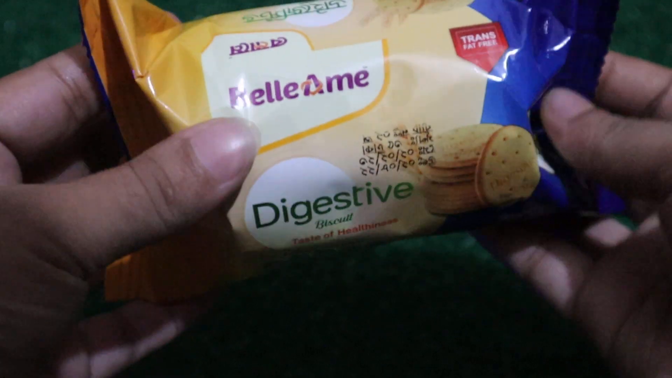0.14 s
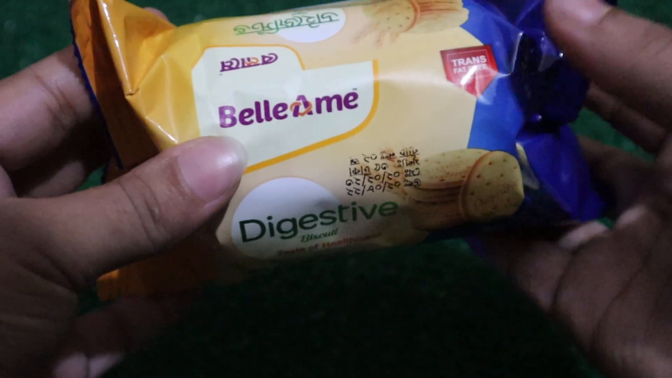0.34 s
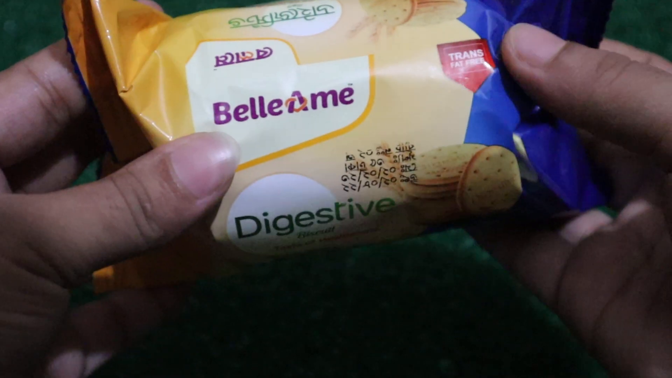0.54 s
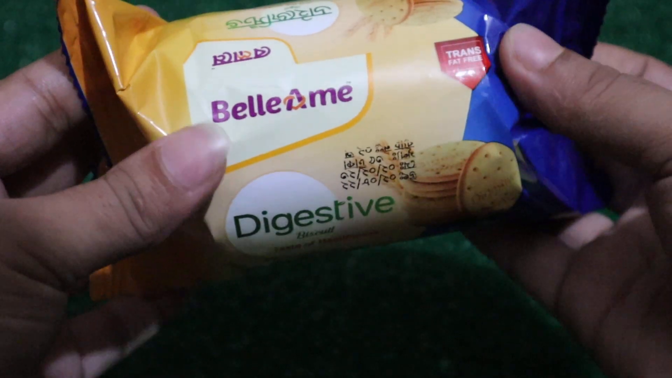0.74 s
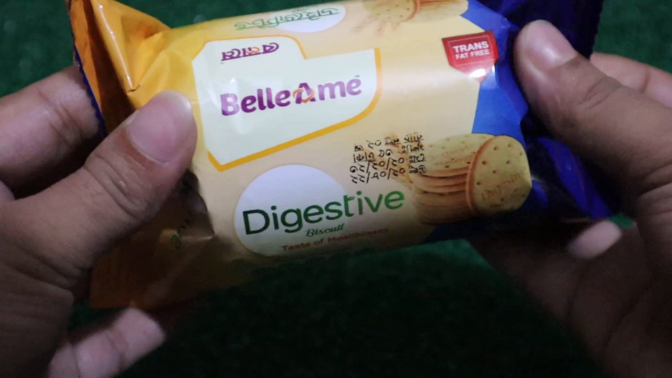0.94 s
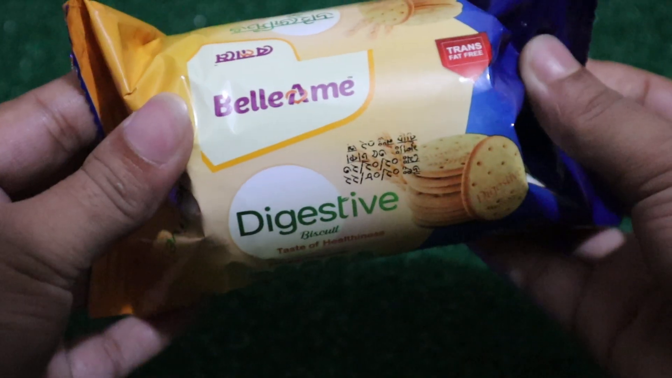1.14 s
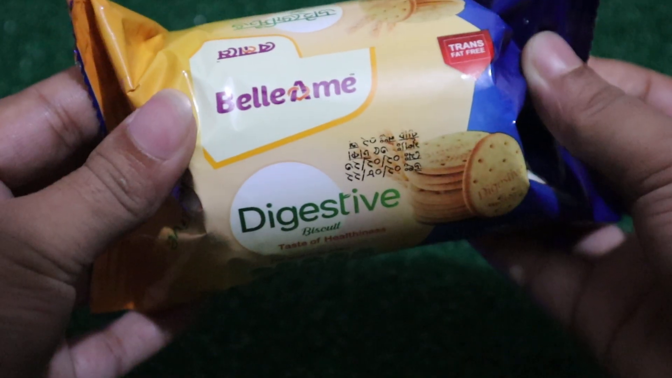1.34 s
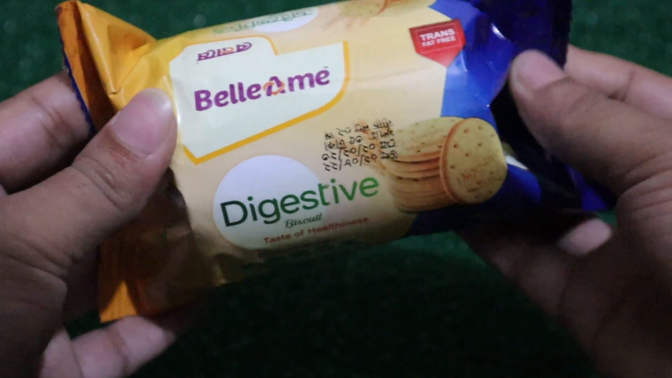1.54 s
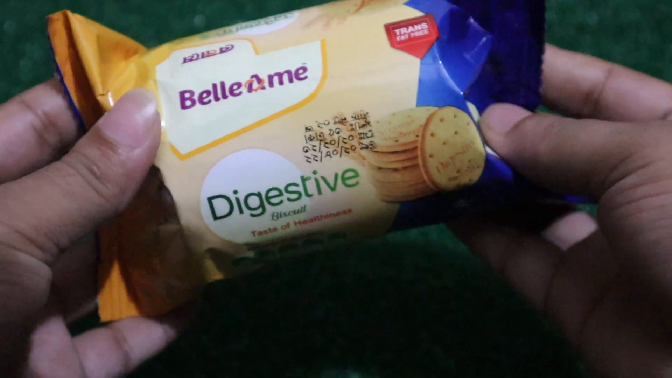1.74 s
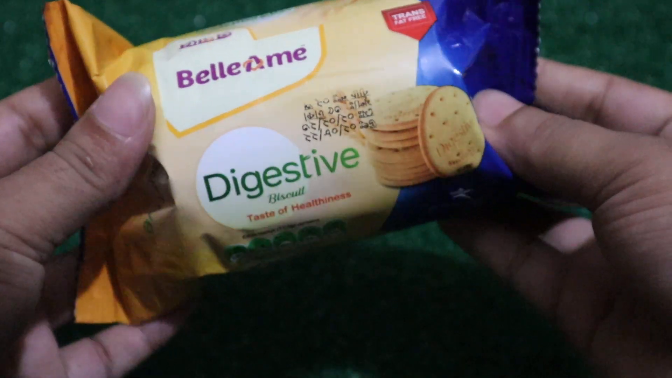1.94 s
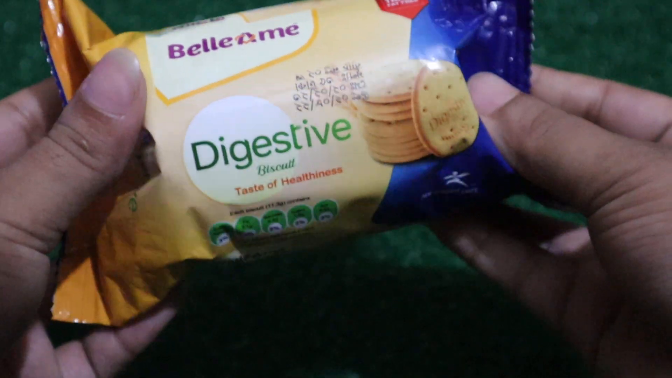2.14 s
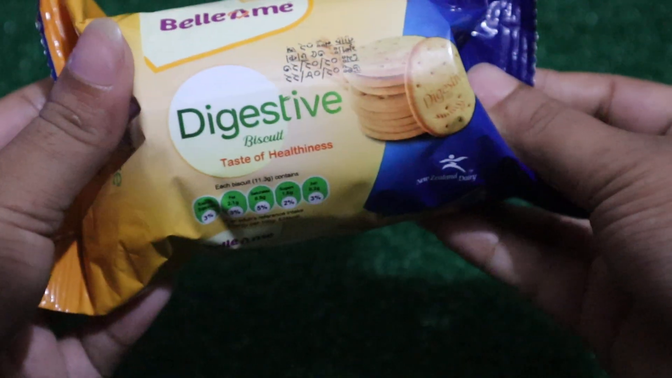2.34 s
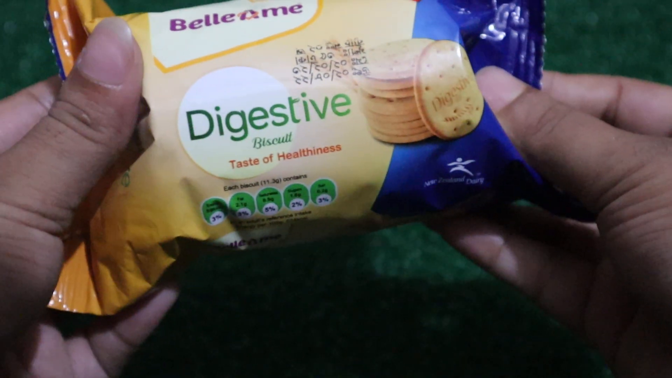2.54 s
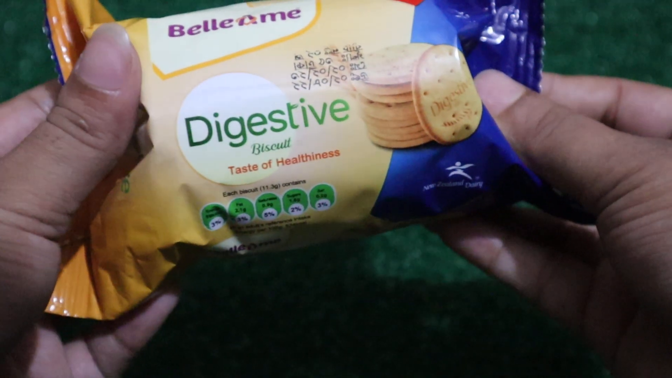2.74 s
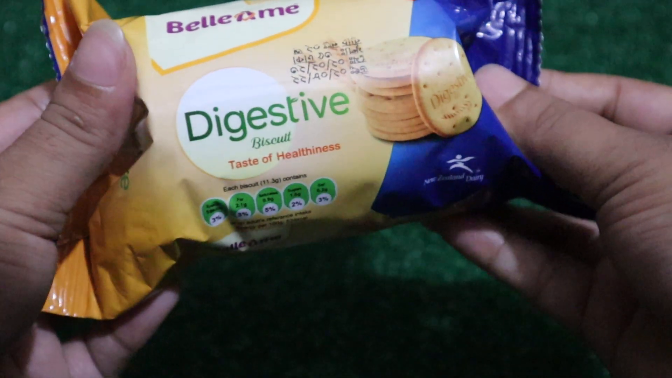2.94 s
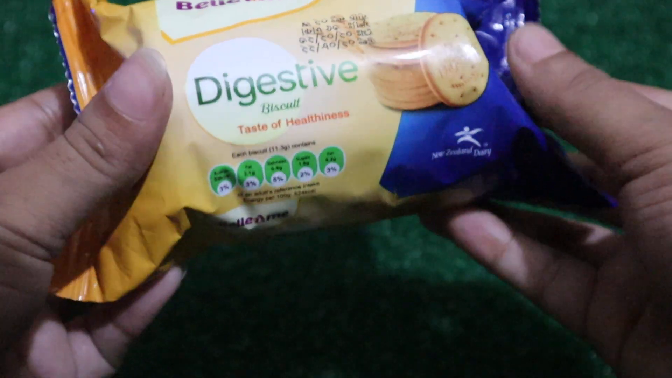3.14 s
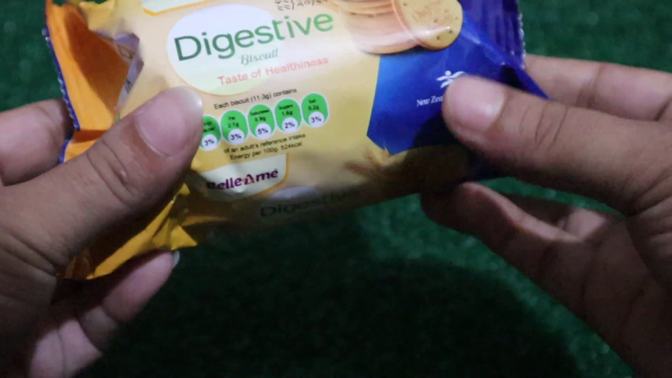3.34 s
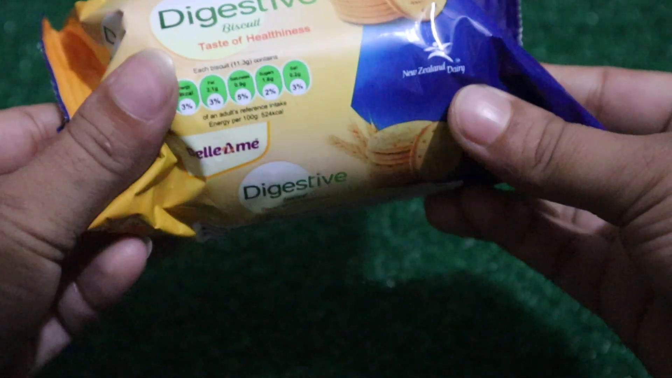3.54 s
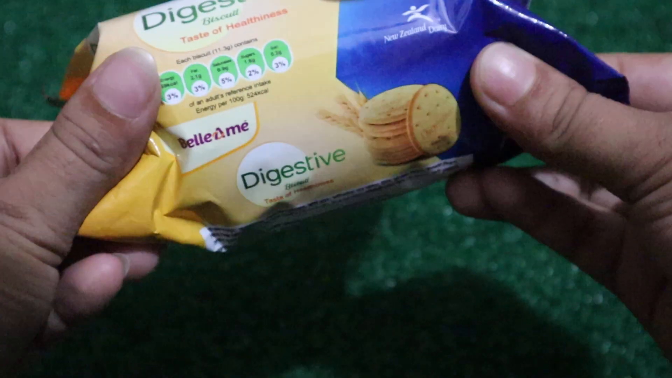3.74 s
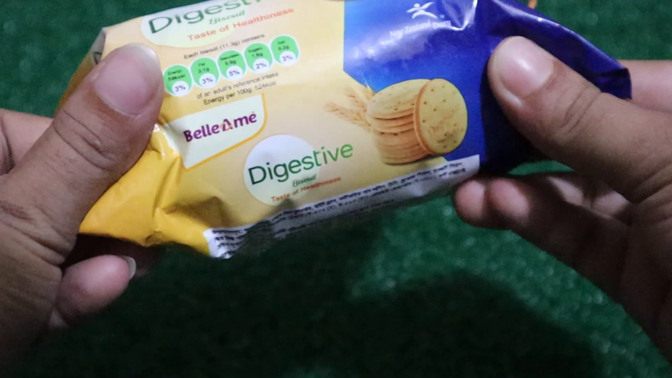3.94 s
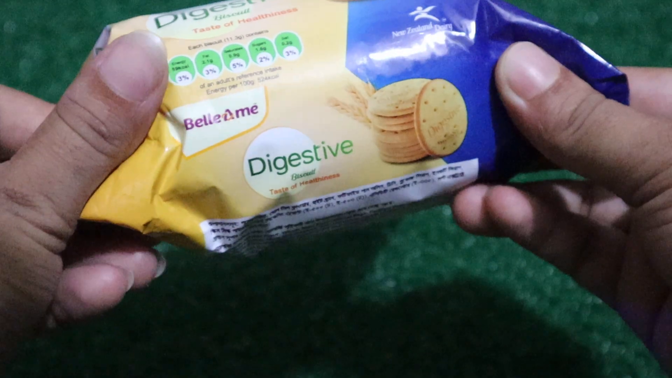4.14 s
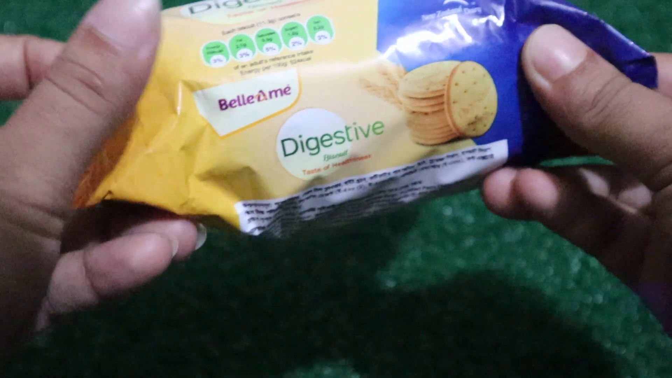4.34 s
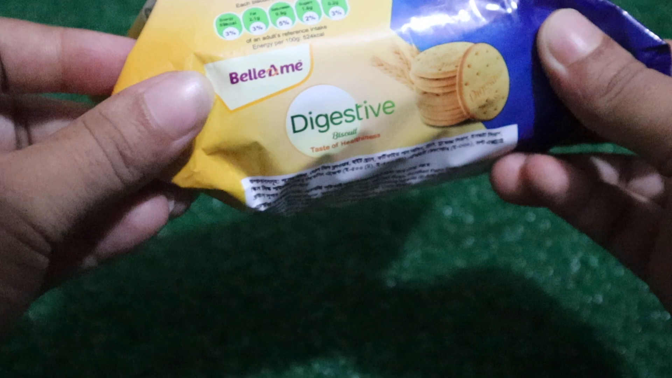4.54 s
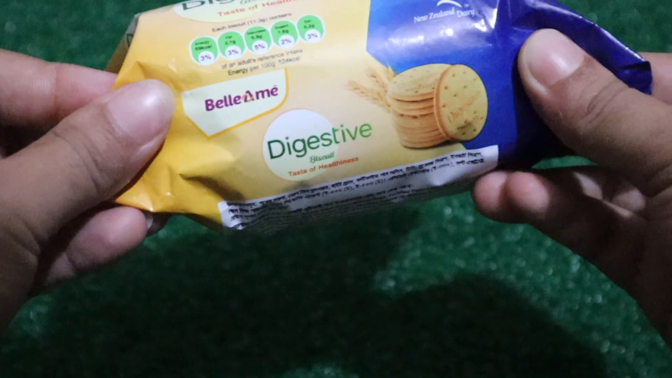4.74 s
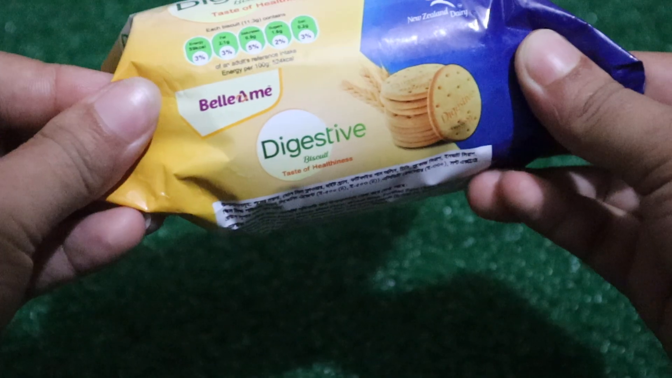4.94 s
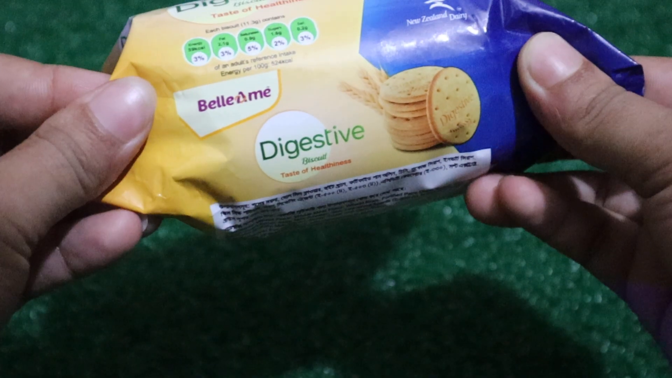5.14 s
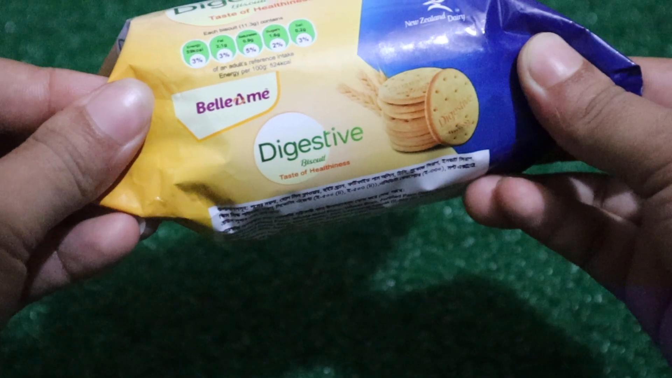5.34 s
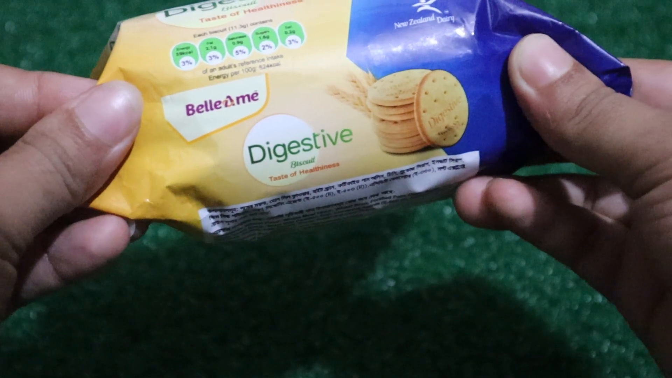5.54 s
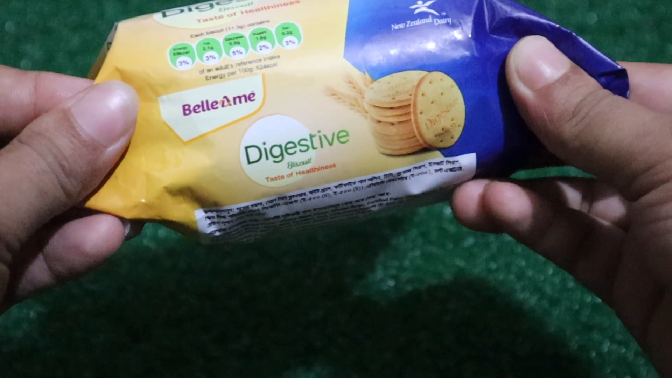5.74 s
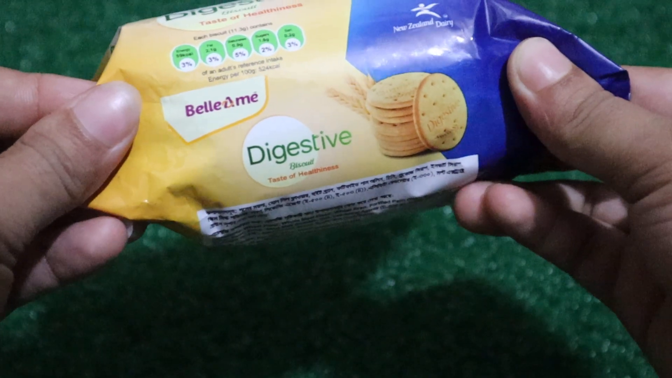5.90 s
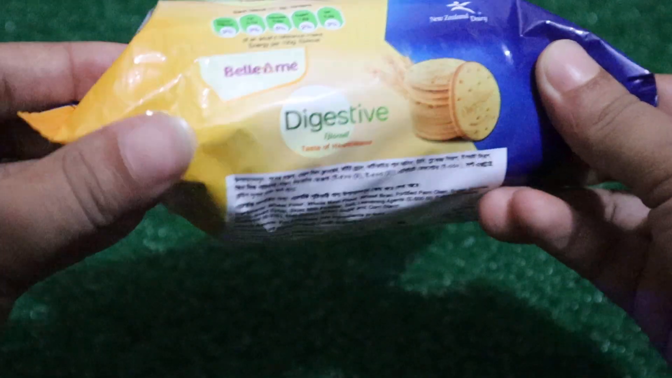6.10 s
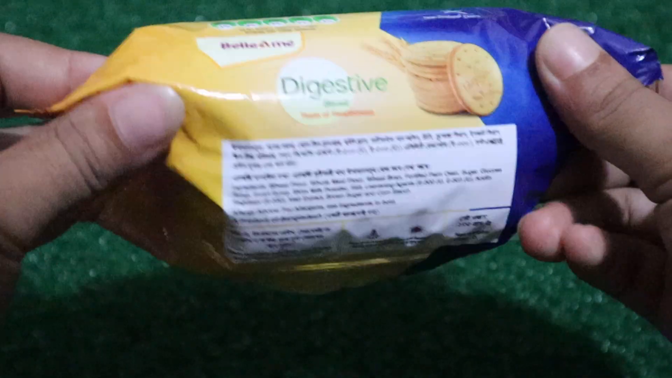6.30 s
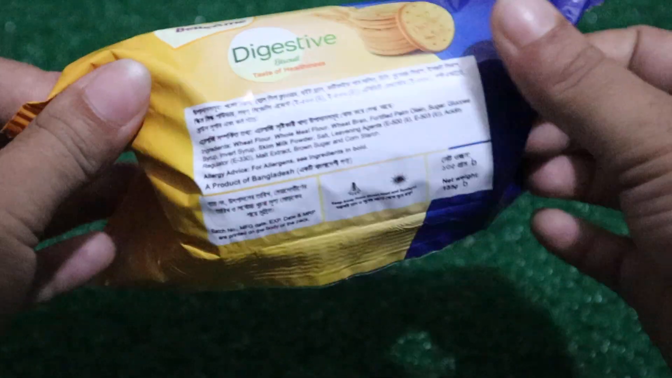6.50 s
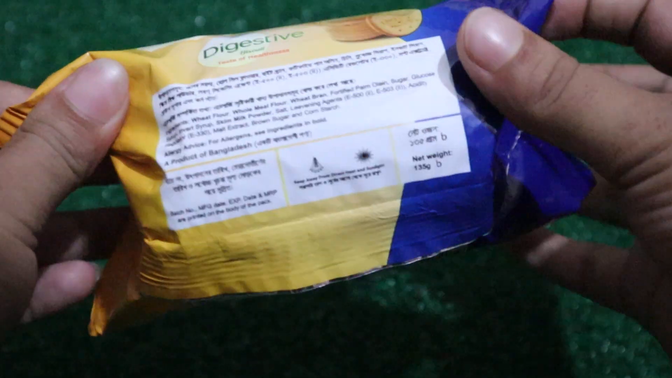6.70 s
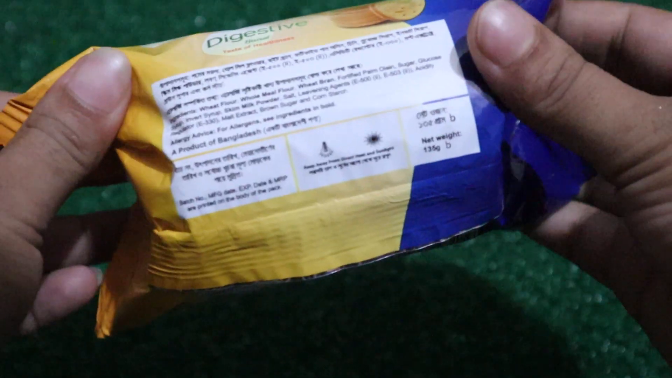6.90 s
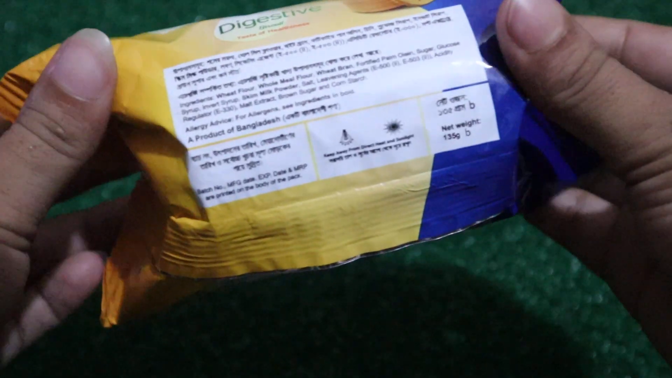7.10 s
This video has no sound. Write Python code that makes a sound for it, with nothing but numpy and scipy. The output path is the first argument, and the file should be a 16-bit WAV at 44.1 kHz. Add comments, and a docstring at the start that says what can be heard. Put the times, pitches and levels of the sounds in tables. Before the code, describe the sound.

A thin, stiff plastic packet is handled close to the microphone in a small room with a faint bright ring. Light crackle opens, with a dull fingertip knock at 0.1 s and a snap near 0.35. After faint ticks, a firm burst of snaps runs from 0.87 to 1.25 s. Sparse crinkles follow at 1.6 to 2.45, with soft low bumps at 1.4 and 1.7, then mostly quiet until 3.1. From 3.4 to 4.2 s the film crackles densely with hard, sharp snaps, then come shorter clusters around 4.3 and 4.6 to 4.8. A long lull lasts until 6.0, leaving soft low room noise and mains hum that dips near 5, and faint, blurred far horns at 5.4 and 5.7. Vigorous crinkling resumes at 6.05, strongest from 6.3 to 6.7, and continues in looser crackles to the end at about 7.1.

```python
"""Crackling plastic packet

Two hands squeeze and turn a plastic biscuit packet close by in a small room. Each squeeze drives fine crackle
and scattered pops; large creases buckle with sharp snaps. All three are short, dispersed rings of a film facet.
Behind them lie shaped room noise, a low hum of wavering sines, a few soft bumps made of damped sines, and far
horns built from upper harmonics, mostly in the longest pause. Random reflections give the packet its room."""
import sys
import numpy as np
from scipy import signal
from scipy.fft import rfft, irfft
from scipy.io import wavfile
from scipy.ndimage import uniform_filter1d

SR = 44100
rng = np.random.default_rng(int(sys.argv[2]) if len(sys.argv) > 2 else 0)


def dump(signal):
    """Clip the signal to [-1, 1] and save it as 16-bit WAV at the path in sys.argv[1]."""
    limited = np.clip(np.atleast_2d(signal).T, -1, 1)
    pcm = np.round(limited * 32767).astype(np.int16)
    wavfile.write(sys.argv[1], SR, pcm)


N = 315756
TIME = np.arange(N) / SR


def amp(db):
    """Decibels to gain."""
    return 10 ** (np.asarray(db) / 20)


def evened(x):
    """Scales to rms 1."""
    return x / np.sqrt(np.mean(x ** 2) + 1e-20)


def read(points, hz):
    """Reads a table on a log-frequency axis."""
    f, value = np.transpose(points)
    return np.interp(np.log(hz + 1), np.log(f + 1), value)


def add(mix, s, sound):
    """Mixes a sound in at s seconds."""
    part = mix[max(round(s * SR), 0):][:len(sound)]
    part += sound[:len(part)]


def wander(rate_hz):
    """Slow random curve of rms 1: noise under a Gaussian low-pass."""
    hz = np.fft.rfftfreq(N, 1 / SR)
    noise = rfft(rng.standard_normal(N))
    return evened(irfft(noise * np.exp(-(hz / rate_hz) ** 2), N))


# Spectrum of the still room. Each row: frequency in Hz, relative level in dB.
AIR_SPECTRUM = [(12, -50.5), (20, -14), (198, -8.5), (255, -12.5), (399, -10.5), (499, -15), (574, -17.5),
                (678, -16), (759, -17), (1150, -19.5), (1910, -23), (2460, -25.5), (16000, -37.5)]
# Mains hum. Each row: frequency in Hz, rms level in dB before the swell.
HUM_TONES = [(100, -62.5), (200.5, -61)]
# The background swells and sinks. Each row: time in seconds, gain in dB.
BACKGROUND_SWELL = [(0, 3.5), (1.4, 3), (2.8, 2), (4.4, 1), (5.0, -2.5), (5.35, 1), (5.9, 2.5), (7.16, 0)]


def background(air_db=-50.5, drift_rad=0.617, drift_hz=3.1):
    """Shaped room noise and a hum of sines with wandering phase share one slow swell."""
    hz = np.fft.rfftfreq(N, 1 / SR)
    noise = rfft(rng.standard_normal(N))
    air = amp(air_db) * evened(irfft(noise * amp(read(AIR_SPECTRUM, hz)), N))
    hum = np.zeros(N)
    for f, db in HUM_TONES:
        phase = 2 * np.pi * f * TIME + drift_rad * wander(drift_hz)
        hum += amp(db) * evened(np.sin(phase))
    swell_db = np.interp(TIME, *np.transpose(BACKGROUND_SWELL))
    return (air + hum) * amp(swell_db)


# Distant horns. Each row: start in seconds, end in seconds, pitch in Hz, level in dB.
HORN_CALLS = [(5.39, 5.55, 346, -48.5), (5.4, 5.55, 411.5, -47.5), (5.68, 5.99, 463, -52.5),
              (1.13, 1.56, 340, -63)]
# What reaches the room of a horn. Each row: frequency in Hz, gain in dB.
HORN_SPECTRUM = [(2000, -38), (2500, -13), (2770, -9), (2900, 5), (3150, -4.5), (3300, 3.5), (3450, -10),
                 (3700, 0.5), (3800, -13), (4100, -15), (5500, -41.5)]


def horns(rise_s=0.014, linger_s=0.16, street_s=0.063, waver=0.005, count=12):
    """Far horns: only upper harmonics carry, blurred by echoes between the houses."""
    out, t = np.zeros(N), TIME[:SR]
    for start, end, pitch_hz, db in HORN_CALLS:
        rise = 1 - np.exp(-t / rise_s)
        blow = rise * np.exp(-np.maximum(t - (end - start), 0) / linger_s)
        drift = evened(uniform_filter1d(rng.standard_normal(SR), SR // 80))
        turns = np.cumsum(pitch_hz * (1 + waver * drift)) / SR
        street = rfft(rng.standard_normal(SR) * np.exp(-t / street_s))
        tone = np.zeros(SR)
        for k in range(count // 2, count):
            harmonic = rfft(np.sin(2 * np.pi * k * turns))
            partial = blow * irfft(harmonic * street, SR)
            tone += amp(read(HORN_SPECTRUM, k * pitch_hz)) * evened(partial)
        add(out, start, amp(db) * evened(tone) * np.sqrt(np.mean(blow ** 2)))
    return out


def thuds(rows):
    """Each soft blow rings one low, damped mode."""
    out, t = np.zeros(N), np.arange(SR // 2) / SR
    for s, db, hz, t60 in rows:
        decay = np.exp(-np.log(1000) * t / t60)
        add(out, s, amp(db) * np.sin(2 * np.pi * hz * t) * decay)
    return out


# Soft booms. Each row: start in seconds, level before decay in dB, pitch in Hz, 60 dB decay in seconds.
SOFT_BUMPS = [(1.417, -30, 69, 0.266), (1.715, -32.5, 70.4, 0.41), (3.255, -33, 69, 0.3),
              (6.279, -40, 42, .2)]


def bumps():
    """The hands nudge the pack and something low booms softly as a damped sine."""
    return thuds(SOFT_BUMPS)


# Fingertip blows. Each row: start in seconds, level before decay in dB, pitch in Hz, 60 dB decay in seconds.
FINGER_KNOCKS = [(.113, -14, 408, 0.039), (4.608, -25.5, 351.6, 0.054)]


def knocks():
    """A fingertip lands on the filled pack, which answers with a short damped mode."""
    return thuds(FINGER_KNOCKS)


# Squeezes and shifts of grip. Each row: start in seconds, end in seconds, effort in dB.
GRIPS = [(0.022, .09, -49), (0.109, 0.361, -42), (.56, 0.853, -52), (.86, 1.019, -35.5), (1.02, 1.125, -33),
         (1.158, 1.246, -45), (1.583, 1.681, -42), (1.91, 2.122, -42), (2.19, 2.32, -45),
         (2.399, 2.424, -42), (3.061, 3.16, -47), (3.27, 3.4, -44), (3.405, 3.54, -37), (3.585, 3.625, -26),
         (3.66, 3.99, -33), (4.0, 4.22, -40), (4.291, 4.333, -32.5), (4.501, 4.55, -43), (4.6, 4.764, -35),
         (6.03, 6.1, -48), (6.09, 6.181, -33), (6.199, 6.35, -37), (6.365, 6.42, -28), (6.46, 6.72, -33.5),
         (6.834, 7.16, -36.5)]


def effort(grip_s=.02, relax_s=.022):
    """How hard the fingers work the film, as a gain: each squeeze builds, holds and relaxes."""
    t = np.linspace(0, N / SR, N // 32)  # a coarse grid is enough for slow fingers
    squeezes = []
    for start, end, db in GRIPS:
        build = np.clip((t - start) / grip_s, 0, 1)
        relax = np.exp(-np.maximum(t - end, 0) / relax_s)
        squeezes.append(amp(db) * build * relax)
    return np.interp(TIME, t, np.max(squeezes, axis=0))


# Colour shared by all creases of the plastic film. Each row: frequency in Hz, gain in dB.
FILM_COLOUR = [(100, -20), (300, -6.5), (650, -1.5), (1200, -5), (2200, -4.5), (3000, -1.5), (4550, 0),
               (5450, -8.5), (6500, -0.5), (7500, -6), (8800, -2.5), (12000, -8.5), (15500, -12)]


def crease(pitch_hz, dullness, q=1.06, q_per_dullness=0.075, scatter=0.3, scatter_s=0.0018, size=1024):
    """A facet of film flips and rings for a few cycles; the packet scatters the click for some ms."""
    hz = np.maximum(np.fft.rfftfreq(size, 1 / SR), 1)
    ratio = hz / pitch_hz
    ring_q = q + q_per_dullness * max(dullness, 0)  # a slow flip rings on one mode, a fast one cracks broadly
    resonance_db = -10 * np.log10(1 + (ring_q * (ratio - 1 / ratio)) ** 2)
    dull_db = -dullness * np.log2(1 + ratio ** 2) / 2  # dullness: extra dB per octave lost above the pitch
    # every facet has its own higher modes, peaks and gaps a few hundred Hz wide
    modes_db = 3.8 * np.interp(np.sqrt(hz), np.linspace(10, 130, 40), rng.uniform(-1.7, 1.7, 40))
    db = read(FILM_COLOUR, hz) + resonance_db + dull_db + modes_db

    # minimum phase: the ring starts at once, with nothing ahead of it
    log_gain = np.log(amp(db - db.max()) + 1e-4)
    mirrored = np.r_[log_gain, log_gain[-2:0:-1]]
    spectrum = np.exp(np.conj(signal.hilbert(mirrored)))[:len(hz)]

    # bending waves disperse: the slow low ones leave the film last, which turns the spike into a short chirp
    lag_s = rng.uniform(.0003, .0009) * np.sqrt(2000 / (hz + 300))
    phase = -2 * np.pi * np.cumsum(lag_s) * SR / size
    click = irfft(spectrum * np.exp(1j * phase), size)

    t = np.arange(size) / SR
    paths = rng.standard_normal(size) * (np.exp(-t / scatter_s) - np.exp(-4 * t / scatter_s))
    paths *= scatter / np.linalg.norm(paths)
    paths[0] = 1  # direct sound
    sound = signal.fftconvolve(click, paths)[:size]
    unit = np.sqrt(SR / 1000) / np.linalg.norm(sound)  # energy of rms 1 over 1 ms
    return sound * rng.choice([-1, 1]) * unit


def crackle(per_s=400, spread_db=5.0, gain_db=-1.0, pitch_hz=1820, pitch_spread=0.52,
            dullness=3.8, dullness_spread=7, count=48):
    """Many tiny creases of random size, pitch and sharpness, as loud as the fingers are busy."""
    happens = rng.random(N) < per_s / SR
    sizes = amp(spread_db * np.minimum(rng.exponential(1, N), 3.2)) * happens
    pitches = pitch_hz * np.exp(pitch_spread * np.sqrt(3) * np.linspace(-1, 1, count))
    facets = [crease(hz, dullness + dullness_spread * rng.uniform(-1.3, 1)) for hz in pitches]
    which, film = rng.integers(0, count, N), np.zeros(N)
    for at in np.flatnonzero(sizes):
        add(film, at / SR, sizes[at] * facets[which[at]])
    return amp(gain_db) * effort() * evened(film)


def pops(firm_db=-33, per_s=80, rate_power=.85, level_db=-21, size_power=0.61, spread_db=5.0,
         pitch_hz=1900, pitch_spread=0.53, dullness=7, dullness_spread=6.3, count=400):
    """Middling creases give way at uneven intervals: more often and louder the firmer the squeeze."""
    force = effort() / amp(firm_db)
    strain = np.cumsum(per_s * force ** rate_power) / SR
    gaps = rng.gamma(2, 1 / 2, count)  # strain from one pop to the next, 1 on average
    moments = np.searchsorted(strain, np.cumsum(gaps))
    out = np.zeros(N)
    for at, (size, high, dull) in zip(moments[moments < N], rng.uniform(-1.12, 1, (count, 3))):
        pop = crease(pitch_hz * np.exp(pitch_spread * high), dullness + dullness_spread * dull)
        level = amp(level_db + spread_db * size) * force[at] ** size_power
        add(out, at / SR, level * pop)
    return out


def yielding(below_db=-16, spread_db=4, lead_s=.004, duller=3, firm_db=-32):
    """Under a firm squeeze, a smaller and duller facet often yields just before a large crease gives way."""
    out, force = np.zeros(N), effort() / amp(firm_db)
    draws = rng.uniform(-1, 1, (len(BUCKLES), 3))
    for (s, db, pitch_hz, dullness), (wait, size, chance) in zip(BUCKLES, draws):
        yields = abs(chance) < force[round(s * SR)]
        tick = crease(pitch_hz, dullness + duller) * yields
        add(out, s - lead_s * np.exp(wait), amp(db + below_db + spread_db * size) * tick)
    return out


# Large buckling creases. Each row: time in seconds, level over 1 ms in dB before the trims below,
# pitch of the facet in Hz, dullness in dB per octave above the pitch.
BUCKLES = [(0.0385, -20.5, 1530, 11), (0.0512, -22.5, 1940, 11), (0.1137, -9, 1950, 4.5),
           (.276, -19, 3850, 20), (.3302, -20, 1870, 11), (.348, -8.5, 3030, 2.5), (.524, -28, 1810, 13),
           (.5649, -26.5, 2200, 6.5), (.6186, -25, 1280, 10), (.6442, -23.5, 2710, 17),
           (.6904, -26, 2740, 22), (.874, -13, 1370, 1), (.8833, -14.5, 2300, 7), (.907, -11, 2000, 0),
           (.922, -6, 2770, 17), (0.9412, -3.5, 2360, 9), (0.9519, -4.5, 1990, 0.5), (.98, -9.5, 2560, 1),
           (1.017, -13.5, 3040, -0.5), (1.0431, -3, 1810, -1), (1.105, -16.5, 2148, 9),
           (1.1161, -3.5, 1320, 8), (1.168, -17.5, 1472, 11), (1.2225, -11.5, 2240, 3.5),
           (1.6362, -8.5, 1230, 1), (1.6912, -12.5, 3420, 12.5), (1.8944, -19.5, 1041, 6.5),
           (1.9345, -17.5, 3370, 20), (1.9884, -14.5, 2640, 12), (2.0364, -21, 1570, 5),
           (2.0488, -10.5, 2530, 1.5), (2.1117, -24.5, 1000, 3), (2.2042, -21.5, 1939, -2),
           (2.2624, -20.5, 1511, 9), (2.2976, -12, 1870, 6.5), (2.3145, -7.5, 1805, 3.5),
           (2.4094, -20.5, 2450, 8), (2.4361, -25.5, 1940, 10), (2.5975, -20, 1370, 14),
           (3.162, -18.5, 850, 1), (3.1778, -19.5, 1582, 9), (3.2806, -22.5, 1376, -3.5),
           (3.2943, -17.5, 2380, -1.5), (3.417, -8.5, 1996, 1.5), (3.4206, -8, 1990, -1.5),
           (3.427, -8.5, 2223, 6), (3.479, -6, 1934, 1.5), (3.5017, -6.5, 1870, 10.5),
           (3.562, -10, 2220, 2), (3.588, -3.5, 1870, 5.5), (3.6085, -5.5, 2080, 8), (3.628, -2.5, 2150, 8),
           (3.642, -13, 1810, -3), (3.6995, -13, 1372, -1), (3.7098, -7.5, 1568, 5), (3.73, -6, 2740, 2.5),
           (3.739, -10, 1570, 2), (3.7501, -6, 1520, -0.5), (3.7538, -13, 3370, -1),
           (3.7852, -17, 520, -0.5), (3.8019, -12, 2150, -3), (3.8075, -10, 1000, 2),
           (3.8455, -4.5, 3485, 5), (3.9147, -16.5, 1280, 9), (3.9604, -5, 2472, 8),
           (3.9891, -6.5, 2364, 8.5), (4.002, -16.5, 2940, 1.5), (4.0223, -10.5, 1564, 9.5),
           (4.0562, -17.5, 1150, 5), (4.0673, -15, 1740, 7), (4.1016, -12.5, 2220, 8),
           (4.1299, -16, 2380, 12), (4.1441, -18.5, 2560, 4), (4.1685, -11, 6740, 14), (4.183, -2, 2374, 5),
           (4.2961, -15.5, 1810, 0), (4.3185, -13, 1900, 7), (4.3309, -4.5, 2081, 10.5),
           (4.3846, -17.5, 1468, 1.5), (4.414, -16.5, 1630, 5), (4.505, -14, 1160, -2),
           (4.6026, -11.5, 1940, 8.5), (4.608, -10, 2243, 4), (4.6353, -8.5, 2016, -2),
           (4.6953, -.5, 2130, 3.5), (4.7274, -12, 2085, 3), (4.742, -12, 876, 0.5), (4.7489, -5, 1516, .5),
           (4.8241, -12, 3274, 9), (5.0655, -39, 1933, 6), (5.384, -36, 1870, 7), (6.048, -23.5, 1677, 0.5),
           (6.0921, -18, 1468, 4.5), (6.1181, -14, 1188, 7), (6.1424, -9.5, 1620, 0.5),
           (6.1726, -8.5, 1580, 1), (6.2252, -10, 1810, 2.5), (6.279, -2.5, 2560, 3),
           (6.327, -10.5, 2656, 6), (6.3623, -5, 3360, 3), (6.3857, -7.5, 2296, -2),
           (6.3902, -7.5, 2000, -1.5), (6.4207, -11.5, 1870, -3), (6.444, -9.5, 2402, 5),
           (6.46, -5, 2630, 5), (6.4807, -13, 1370, -2), (6.5098, -15, 1192, 1.5), (6.5602, -3, 2155, 3),
           (6.5725, -6.5, 1996, 3.5), (6.64, -10, 2088, 6), (6.6523, -11, 2734, 14),
           (6.6792, -4.5, 2937, 14), (6.738, -13.5, 1259, 1.5), (6.7541, -18.5, 1030, -.5),
           (6.8385, -14, 3060, 3), (6.8651, -14, 1419, 5.5), (6.9101, -11, 1562, 2.5),
           (6.9537, -7.5, 1998, 2.5), (7.0578, -12.5, 2554, 8), (7.112, -10.5, 2280, 6),
           (7.1225, -10, 2734, 2), (7.1281, -12, 2300, 2), (7.142, -13.5, 2657, -0.5)]


def snaps(gain_db=-0.49, after_share=.3, after_db=-9, after_s=.002):
    """The large creases give way one by one; some jerk again a few ms later as the fold runs on."""
    out = np.zeros(N)
    for (s, db, pitch_hz, dullness), (chance, wait) in zip(BUCKLES, rng.random((len(BUCKLES), 2))):
        first, second = crease(pitch_hz, dullness), crease(pitch_hz, dullness)
        add(out, s - .0003, amp(db + gain_db) * first)  # starts early to allow for the lag in the film
        jerks = chance < after_share
        add(out, s + after_s * (.5 + 2 * wait), jerks * amp(db + after_db) * second)
    return out


# How long the room rings. Each row: frequency in Hz, 60 dB decay in seconds.
RING_T60 = [(200, 0.03), (1000, 0.33), (3500, 0.47), (8000, 0.24), (15000, 0.23)]
# Tone of the ring at its start. Each row: frequency in Hz, gain in dB.
RING_COLOUR = [(200, -1.5), (1000, -1), (2200, -5), (4000, 0.5), (8000, 2.5), (15000, -3)]


def room(x, wet_db=-15.5, first_s=0.0054, size=256, spacing=12):
    """Sparse reflections of random sign, each band dying at its own speed."""
    hits = rng.random(SR) < 1 / spacing  # one reflection in 12 samples on average
    taps = rng.standard_normal(SR) * hits * (TIME[:SR] > first_s)
    hz, t, bands = signal.stft(taps, SR, nperseg=size)
    decay = np.exp(-np.log(1000) * t / read(RING_T60, hz)[:, None])
    bands = bands * amp(read(RING_COLOUR, hz))[:, None] * decay
    tail = signal.istft(bands, SR, nperseg=size)[1]
    return amp(wet_db) * signal.fftconvolve(x, tail / np.linalg.norm(tail))[:N]


def turning_room(x, half_cycles_per_s=3.0, count=3):
    """The packet turns in the hands, so it sends its sound along changing paths through the room."""
    out = np.zeros(N)
    for k in range(count):
        facing = np.cos(np.pi * (half_cycles_per_s * TIME + k / count))
        out += room(x * facing * np.sqrt(2 / count))  # the shares keep a constant total power
    return out


def scene():
    """The packet near by, its ring in the room, and the background."""
    behind = background() + horns() + bumps()
    packet = knocks() + crackle() + pops() + yielding() + snaps()
    return (packet + turning_room(packet) + behind)[None]


def record(dry, edge_hz=16100):
    """Clips peaks at full scale, then cuts everything above the band edge."""
    clipped = np.clip(dry, -1, 1)
    low_pass = signal.firwin(401, edge_hz, window=("kaiser", 8), fs=SR)
    return signal.oaconvolve(clipped, low_pass[None], "same")


dry = scene()
out = record(dry)
dump(out)
```